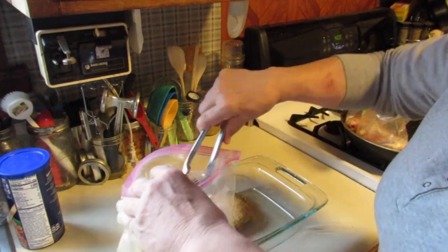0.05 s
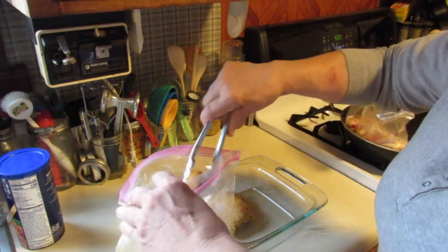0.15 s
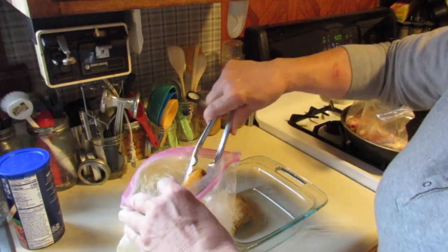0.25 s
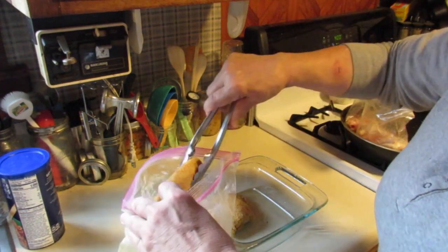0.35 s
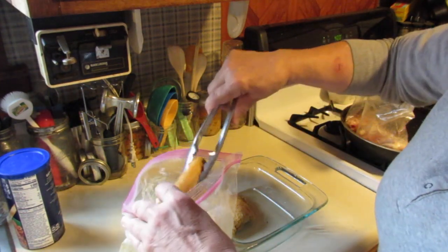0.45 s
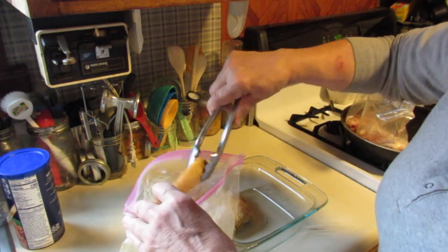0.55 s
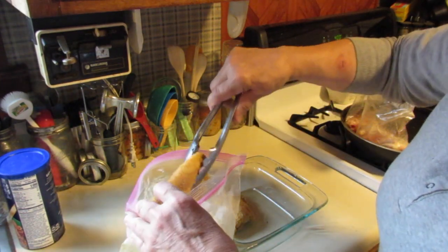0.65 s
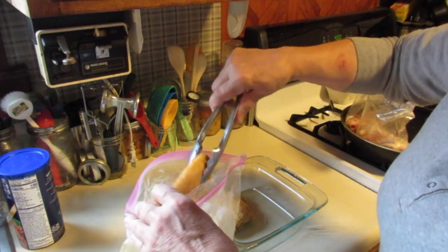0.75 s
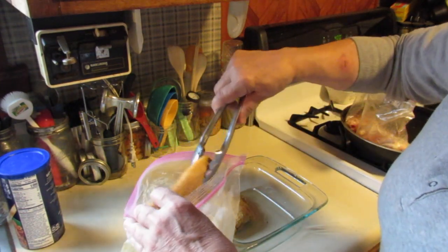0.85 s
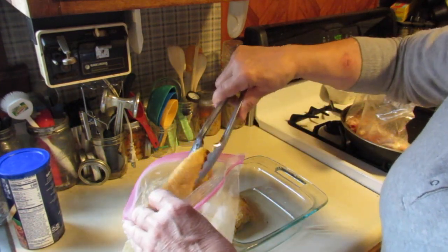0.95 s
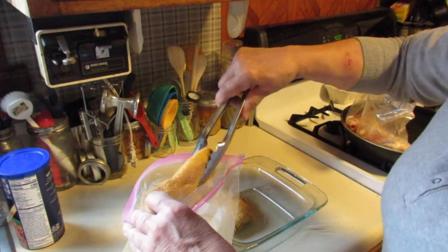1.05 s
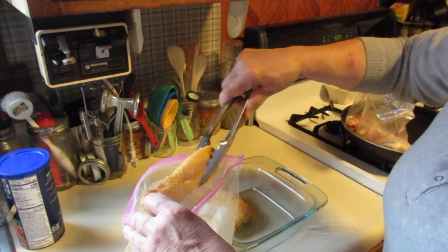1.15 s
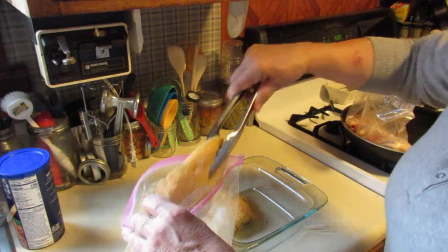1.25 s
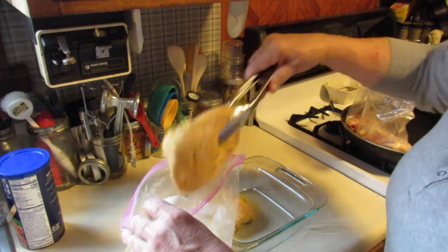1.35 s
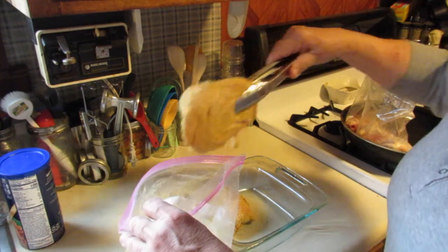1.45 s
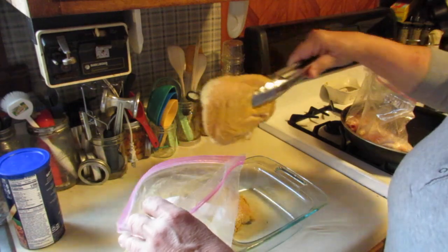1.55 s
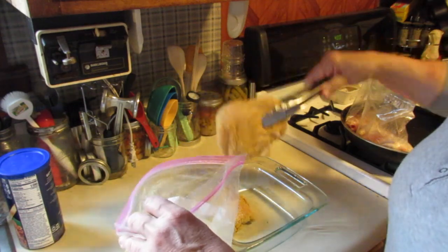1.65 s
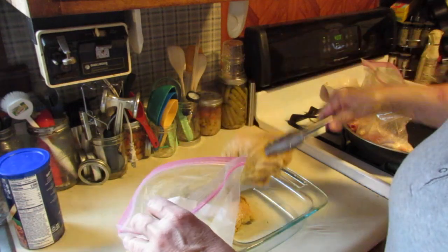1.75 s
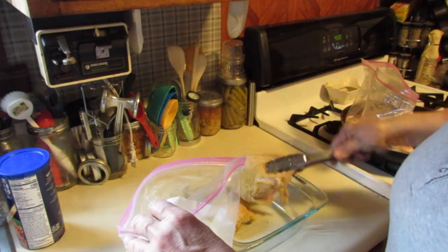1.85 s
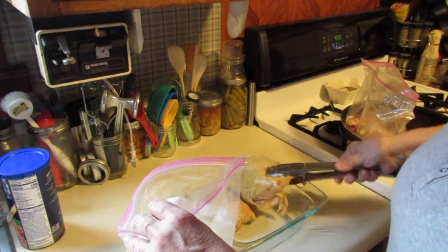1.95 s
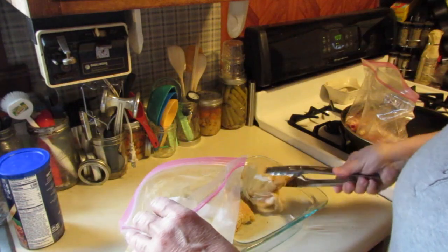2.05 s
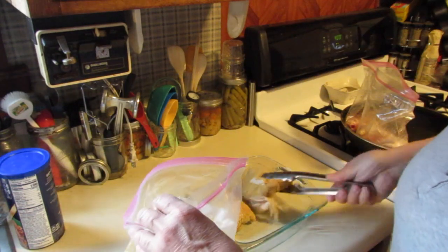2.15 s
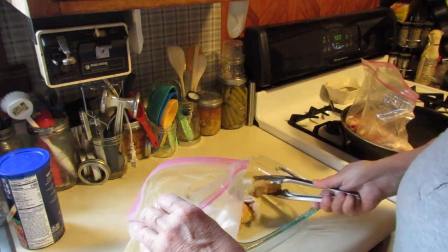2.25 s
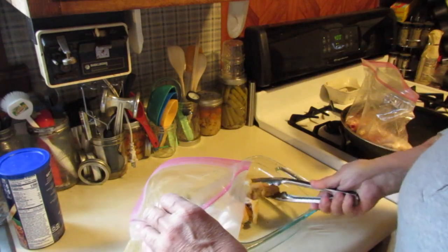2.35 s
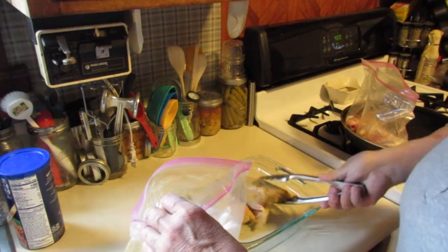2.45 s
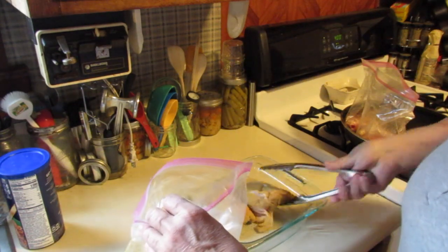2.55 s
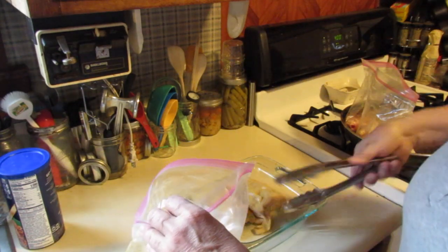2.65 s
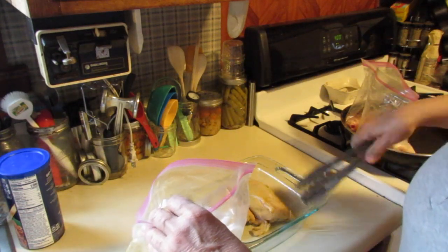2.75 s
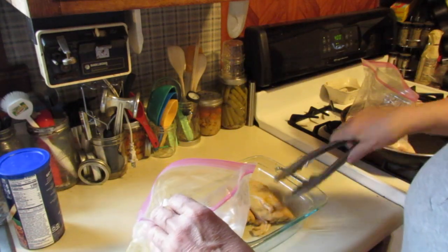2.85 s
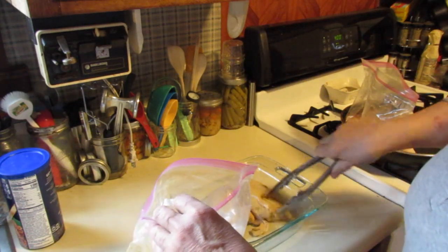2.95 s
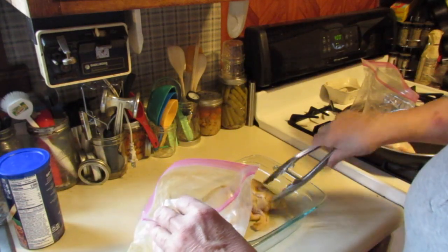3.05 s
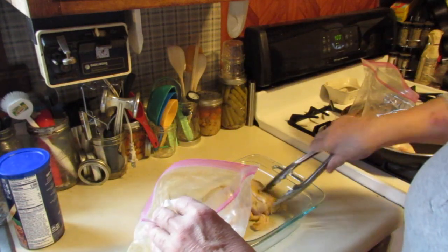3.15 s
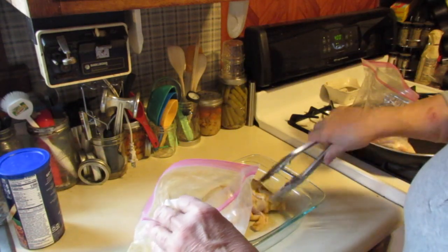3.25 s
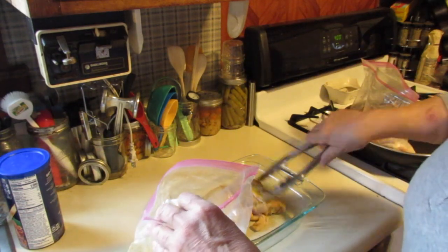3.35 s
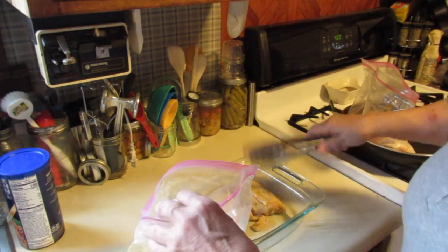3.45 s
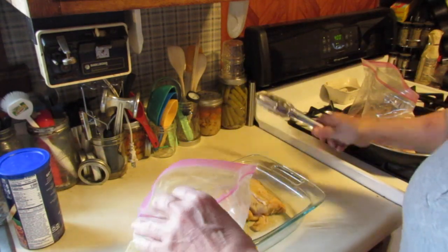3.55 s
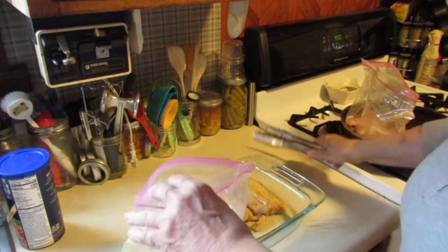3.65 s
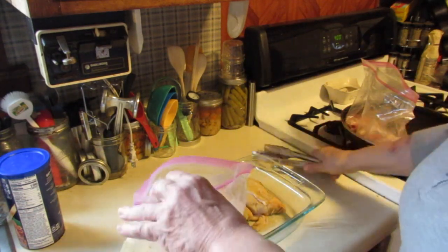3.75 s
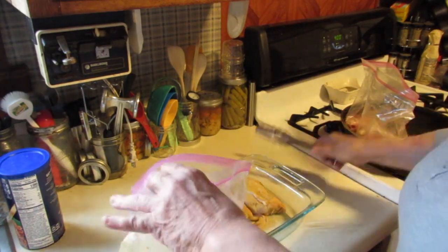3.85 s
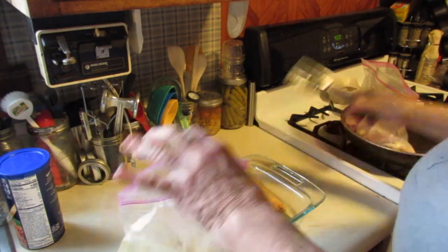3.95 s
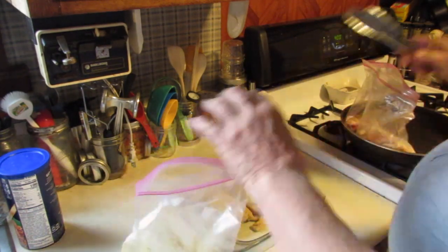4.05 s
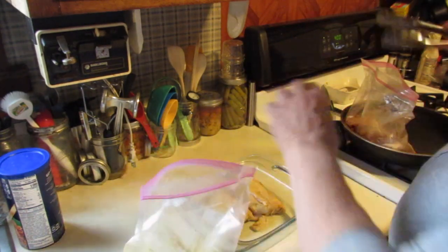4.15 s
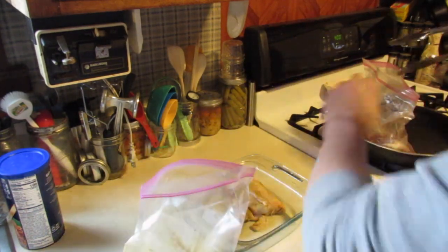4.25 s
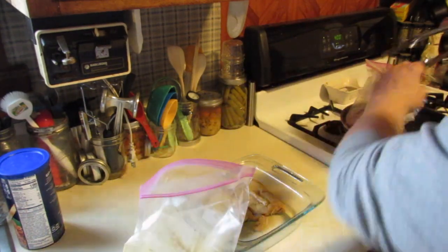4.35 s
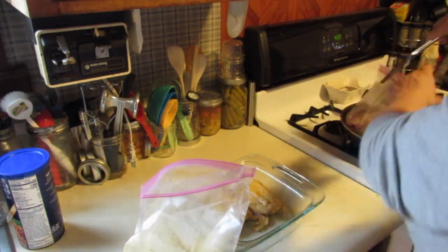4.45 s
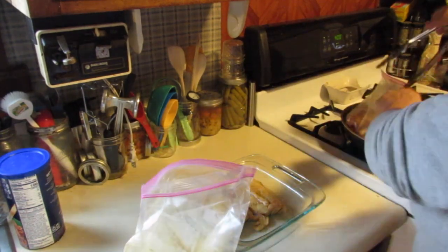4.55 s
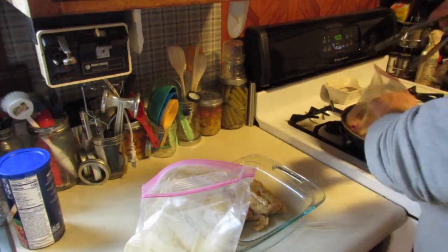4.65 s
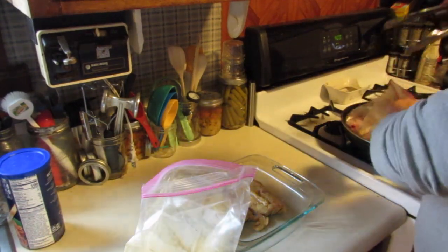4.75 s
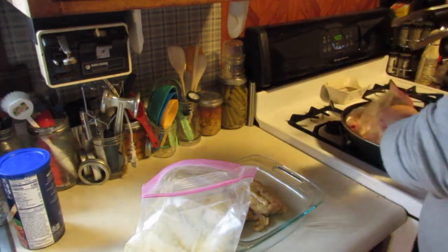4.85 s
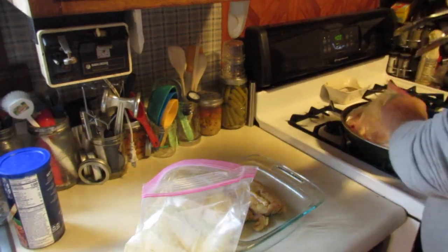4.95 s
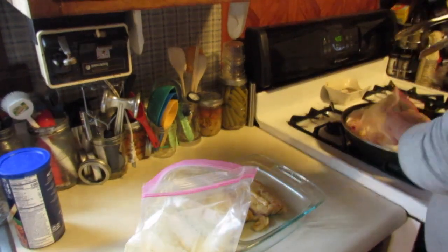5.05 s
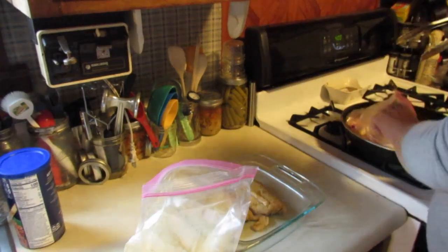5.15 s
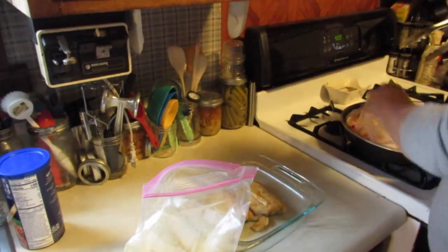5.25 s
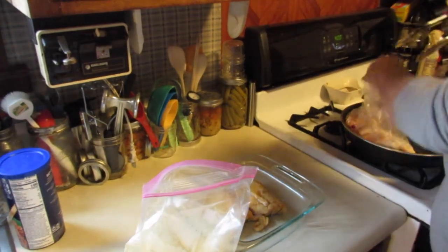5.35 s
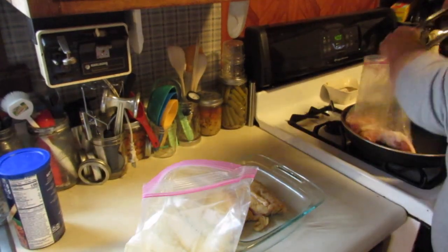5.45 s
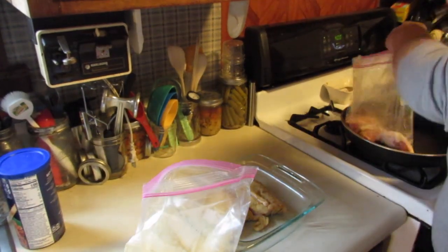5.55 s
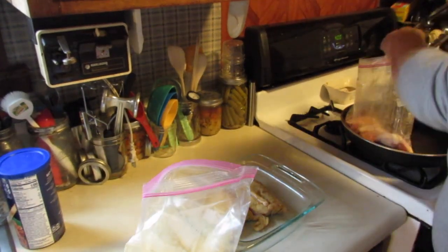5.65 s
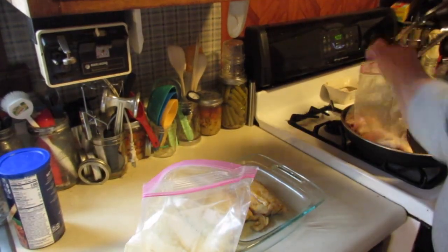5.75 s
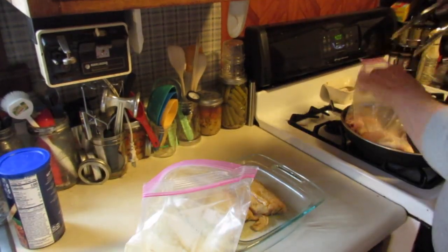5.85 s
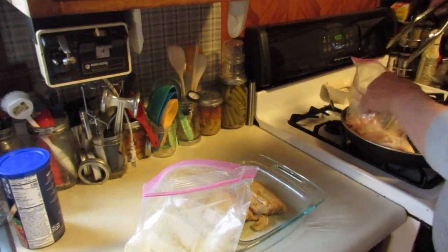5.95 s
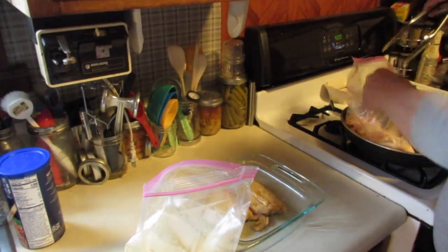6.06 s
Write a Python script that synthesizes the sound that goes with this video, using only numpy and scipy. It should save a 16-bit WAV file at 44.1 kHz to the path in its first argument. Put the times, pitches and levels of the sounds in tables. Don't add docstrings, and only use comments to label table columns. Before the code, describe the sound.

In a small kitchen, film rustles and snaps, steel tongs clack and jangle on glass, then a heavier plastic bag crinkles loudly over low fridge hum.

```python
import sys
import numpy as np
from scipy import signal
from scipy.fft import rfft, irfft, next_fast_len
from scipy.io import wavfile
from scipy.ndimage import uniform_filter1d

SR = 44100
rng = np.random.default_rng(int(sys.argv[2]) if len(sys.argv) > 2 else 0)


def nominal_scale(level):
    x = np.asarray(level, float) / 20
    return 10 ** x


def digitize_waveform(pressure):
    field = np.atleast_2d(pressure).T
    bounded = np.clip(field, -1, 1)
    quanta = np.round(bounded * 32767).astype(np.int16)
    wavfile.write(sys.argv[1], SR, quanta)


N = 268569


def evened(x):
    return x / np.sqrt(np.mean(x ** 2) + 1e-20)


def read(points, hz):
    f, value = np.transpose(points)
    return np.interp(np.log(hz + 1), np.log(f + 1), value)


def add(mix, s, sound):
    part = mix[round(s * SR):][:len(sound)]
    part += sound[:len(part)]


def colour(points, tilt_db=0):
    hz = abs(np.fft.fftfreq(4096, 1 / SR))
    tilt = tilt_db * np.tanh(np.log((hz + 1) / 3000))
    log_gain = np.log(nominal_scale(read(points, hz) + tilt))
    taps = np.fft.ifft(np.exp(np.conj(signal.hilbert(log_gain)))).real[:2048]
    return taps / np.linalg.norm(taps)


def resonate(x, hz, width):
    return signal.lfilter(*signal.iirpeak(hz, hz / width, SR), x)


def swell(rows):
    s, db, rise, fall = np.array(rows).T[:4, :, None]
    t = np.arange(0, N / SR + 1, 1 / 1000) - s
    climb = -t / np.maximum(rise, 0.003)
    decay = t / np.maximum(fall, 0.003)
    return nominal_scale(db - 20 * np.where(t < 0, climb, decay))


def stretched(curve):
    return np.interp(np.arange(N) / SR * 1000, np.arange(len(curve)), curve)


def creases(per_s, spread_db):
    clumps = nominal_scale(0.48 * evened(uniform_filter1d(rng.standard_normal(N), 400)))
    size = nominal_scale(spread_db * np.minimum(rng.exponential(1, N), 5))
    size *= rng.choice([-1., 1.], N)
    return evened(size * clumps * (rng.random(N) < per_s / SR))


CHATTER_DB = 3.5


def struck(shake, modes, twins, chatter):
    out = np.zeros(len(shake))
    settling = np.minimum(np.arange(len(shake)) / SR / 0.015, 1)
    for k, ((hz, width, db), twin) in enumerate(zip(modes, twins)):
        width = max(width, 24 + hz / 200)
        share = np.linalg.norm(shake) * np.sqrt(np.pi * width / SR / len(shake))
        family = evened(resonate(shake, hz, width))
        family -= nominal_scale(-6) * evened(resonate(shake, hz * twin, width))
        family += nominal_scale(-15.5) * evened(resonate(shake, hz / twin ** 1.67, width))
        flicker_db = CHATTER_DB * settling * np.roll(chatter, shift=k * 377)
        out += nominal_scale(db + flicker_db) * share * family
    return out


# start in seconds, force in dB,
# clatter in dB, clatter brightness in dB, rattle in seconds.
BLOWS = [(2.3172, -34, -58, -32, 0.073), (2.5143, -17.5, -22, -4.5, 0.014), (2.6096, -30, -38, -2.5, 0.011),
         (2.7356, -19.5, -31, 1, 0.014), (2.7576, -23.5, -30, 4, 0.024), (2.779, -24, -24.5, 10, 0.019),
         (2.7876, -33, -23.5, 3, 0.015), (2.9521, -16, -15, 6, 0.0039), (2.9565, -16, -25, -2.5, 0.016),
         (3.1919, -17, -19, 0.5, 0.018), (3.3146, -33, -36.5, 12, 0.016), (3.788, -13, -21, 14, 0.0097)]
BOUNCES = [
    (2.5142, -25, -15.5, -0.5, .001),
    (2.5195, -36, -34, 5, 0.0045),
    (2.7607, -34, -20, 5, .006),
    (2.9615, -35, -37, 6, 0.0074),
    (3.1957, -22.5, -29, 1, .01),
    (3.2065, -23, -34, 2, 0.0078),
    (3.318, -34, -40, 10, 0.0091),
    (3.7878, -28, -17, -3.5, 0.0011),
    (3.7925, -26, -36, 2, .01),
    (3.9331, -50, -48, -4, .01),
]
GRIPS = [2.4, 2.6, 2.7, 2.75, 2.9, 3.1, 3.3, 3.6]
# pitch in Hz, width in Hz, level in dB.
DISH = [
    [(298, 53, -1.5), (438, 65, -1), (613, 78, -0.5), (830, 79, -7)],
    [(357, 47, -6), (1086, 59, 3), (1210, 37, -5), (2340, 29, 1), (1390, 50, -9), (435, 40, -8),
     (586, 56, -9), (850, 50, -6), (1000, 50, 0), (2610, 36, -10)],
    [(1254, 91, 7.5), (1470, 80, -3), (2050, 68, -11), (2600, 90, -8)],
    [(424, 110, -7.5), (1366, 24, 13), (1804, 56, 6), (1603, 44, -1), (2390, 72, -14), (3060, 54, -8)],
    [(460, 24, 5), (2280, 21, -3), (1165, 45, -3), (2130, 37, -6.5), (2680, 40, -13)],
    [(436, 63, 6.5), (560, 40, -14), (1337, 28, 4), (2546, 46, -7.5), (846, 46, -2), (2170, 53, -13),
     (480, 30, -4), (1023, 45, -7), (1140, 37, -13), (270, 24, -1)],
    [(430, 21, 6), (600, 60, 1), (800, 100, 1.5), (1352, 29, 13), (2196, 55, -5.5), (2575, 45, -1.5),
     (1003, 42, -3), (494, 20, -0.5), (940, 45, -2.5), (1127, 62, -3)],
    [],
    [(437, 22, 7), (603, 70, 9.5), (840, 65, -1.5), (1040, 160, 1), (1270, 100, 3.5), (1507, 68, 1),
     (1680, 39, 1), (1963, 37, -14), (1870, 32, -8), (492, 44, -2)],
]
# pitch in Hz, width in Hz, level in dB.
TONGS = [
    [],
    [(4960, 1100, -8), (5950, 930, -2.5), (7040, 420, -4), (6360, 40, -9), (4800, 30, -10), (7080, 38, -5),
     (8260, 25, -12), (9400, 150, -18)],
    [(6000, 660, -7)],
    [(3250, 650, -23), (4200, 53, -32), (4770, 75, -14), (6240, 130, -7)],
    [(4000, 54, -4.5), (4780, 23, -2), (4120, 54, -17), (8200, 820, -12), (10500, 460, -18), (7900, 40, -5),
     (8506, 40, -10), (11600, 150, -22)],
    [(3630, 50, -9), (4160, 54, -9), (6600, 460, -6), (7400, 1050, -12), (7900, 54, -8.5), (6800, 31, -17),
     (6800, 25, -20), (4974, 35, -14.5), (3380, 30, -14)],
    [(3180, 130, -3.5), (3960, 40, -5), (4710, 73, -6.5), (6700, 320, -8.5), (8210, 140, -5.5),
     (6350, 35, -4.5), (8140, 22, -8), (8850, 35, -17), (7470, 25, -5)],
    [(6900, 160, -15), (8600, 500, -15)],
    [(4300, 70, -23), (6300, 35, -9), (8900, 33, -9), (3170, 26, -14), (3110, 350, -4), (4660, 40, -7),
     (4880, 24, -3.5), (7340, 45, -4), (7600, 30, -12), (5670, 380, -15.5), (8450, 1900, -8.5),
     (10340, 380, -8.5)],
]
# frequency in Hz, level in dB.
CLATTER = [(60, -52), (200, -0.5), (400, 1), (1200, -6.5), (2500, 1), (4500, -5), (7000, -2), (10000, -0.5),
           (15000, -6)]


def tongs(blows):
    u, out = np.arange(9000) / SR, np.zeros(N)
    chance = rng.standard_normal((len(blows), 9000))
    twins = 1 + rng.uniform(0.008, 0.041, (len(DISH), 24)) * rng.choice([-1, 1], (len(DISH), 24))
    low_cut = signal.butter(2, 260, "high", fs=SR)
    for (s, force_db, clatter_db, bright_db, rattle), noise in zip(blows, chance):
        grip = np.searchsorted(GRIPS, s)
        shake = noise * np.exp(-u / max(rattle, 0.001)) * np.minimum(u / 0.0004, 1)
        shake[0] += 3
        chatter = evened(uniform_filter1d(noise[::-1], size=300))
        body = struck(shake, DISH[grip] + TONGS[grip], twins[grip], chatter)
        add(out, s, nominal_scale(force_db + 14.5) * signal.lfilter(*low_cut, body))
        add(out, s, nominal_scale(clatter_db) * signal.fftconvolve(shake, colour(CLATTER, bright_db)))
    return out


# start in seconds, stop in seconds,
# level in dB.
RINGS = [
    (2.635, 2.76, -51),
    (2.81, 2.975, -38.5),
    (3.015, 3.187, -36),
    (3.244, 3.42, -32.5),
]
RING_HZ, RING_T60_S, RING_RISE_S = 1352, 1.04, 0.016
RING_WAVER_DB, RING_WAVER_RAD = 0.4, 0.092


def ring():
    out = np.zeros(N)
    for s, stop, db in RINGS:
        t = np.arange((stop - s) * SR) / SR
        rise = 1 - np.exp(-(t / RING_RISE_S) ** 2)
        damping = np.minimum(t[::-1] / (0.51 * (stop - s)), 1)
        swing, slip = (evened(uniform_filter1d(rng.standard_normal(len(t)), size=900)) for _ in range(2))
        tone = np.sin(2 * np.pi * RING_HZ * (t + s) + RING_WAVER_RAD * slip)
        level = nominal_scale(db - 60 * t / RING_T60_S + RING_WAVER_DB * swing)
        add(out, s, level * rise * damping * tone)
    return out


# peak in seconds, level in dB, 20 dB rise in seconds, 20 dB fall in seconds
JIGGLE = [
    (2.662, -49.5, 0.46, 0.1),
    (2.86, -60, -2.3, 0.3),
    (3.05, -57.5, -0.6, 1.16),
    (3.32, -49.5, -0.3, -0.22),
    (3.435, -56, -0.1, -0.4),
]
# pitch in Hz, width in Hz, level in dB.
HINGE = [(4830, 590, -2), (6900, 460, 4), (8100, 1900, 12), (10400, 1400, 4), (11800, 1200, -4)]


def hinge():
    knocks = creases(per_s=4900, spread_db=4.0)
    rings = evened(sum(nominal_scale(db) * resonate(knocks, hz, width) for hz, width, db in HINGE))
    return stretched(swell(JIGGLE).sum(0)) * rings


def puckered(x, patchy_db):
    z = signal.stft(x, nperseg=256)[2]
    patches = rng.standard_normal(z.shape[::-1])
    patches = evened(uniform_filter1d(uniform_filter1d(patches, 8, 0), 4, 1)).T
    return evened(signal.istft(z * nominal_scale(patchy_db * patches), nperseg=256)[1][:N])


# peak in seconds, crackle in dB, 20 dB rise in seconds,
# 20 dB fall in seconds, body of the film in dB over the crackle.
NEAR_BAG = [(0.0, -48.5, .01, 1.14, 3.5), (.044, -48, -0.1, 0.04, -9), (.072, -48, .03, .03, -4),
            (.199, -53, -0.36, -0.04, 2), (.361, -50, -0.05, -0.22, 0), (.31, -56, -0.7, 0.7, -4),
            (0.602, -48, .015, 0.05, -4), (.7, -53.5, 0.03, 0.16, 2.5), (1.01, -55.5, 1, 0.35, -2),
            (1.18, -60, 0.5, 0.36, 9.5), (1.325, -48.5, 0.08, 0.17, -2), (1.392, -46, 0.06, 0.11, 4.5),
            (1.5, -62, 0.05, 0.3, -2), (1.58, -60, 0.05, 0.2, -6)]
PAN_BAG = [(3.9, -49.5, 0.021, 0.14, 2.5), (4.061, -47, 0.035, 0.067, 3.5), (4.188, -57, .02, .1, -11),
           (4.29, -53.5, 0.017, 0.69, 4), (4.44, -38.5, 0.01, 0.087, 5.5), (4.52, -40.5, 0.003, 0.15, 7.5),
           (4.558, -32.5, 0.068, 0.077, -2), (4.73, -53, 0.022, 0.21, 8.5),
           (4.834, -42.5, 0.0082, 0.24, -2), (5.039, -39, 0.16, 0.41, 2.5), (5.17, -39.5, 0.34, 0.085, -7),
           (5.259, -42.5, 0.008, 0.068, -6), (5.335, -43.5, .05, 0.11, 2.5), (5.384, -36, 0.058, 0.057, 3),
           (5.441, -38.5, 0.031, 0.13, 8), (5.462, -38.5, 0.023, 0.045, 7.5), (5.481, -31, 0.11, 0.076, 0),
           (5.53, -40.5, 0.066, .06, 3.5), (5.66, -51.5, 0.086, 0.064, 9), (5.727, -47.5, 0.013, 0.22, 2.5),
           (5.792, -44.5, 0.021, 0.21, 2), (5.88, -44.5, 0.12, 0.03, 2), (6.0, -48, 0.042, 0.14, 3),
           (6.06, -38, 0.0062, 0.048, -1.5)]
# peak in seconds, level in dB, 20 dB rise in seconds,
# 20 dB fall in seconds.
SETTLING = [
    (4.523, -32, 0.05, 0.19),
    (5.035, -40, 0.07, -0.5),
]
# frequency in Hz, level in dB.
CRACKLE = [(1500, -28), (3000, -1.5), (4500, -1), (7000, 1), (10000, -1.5), (15500, -8.5)]
FILM = [(300, 1.5), (600, 0), (1000, 4.5), (1800, 2.5), (2600, -4), (4500, -17), (9000, -80)]
FLAP = [(30, -11), (80, -17), (200, -5.5), (400, 1.5), (700, -11), (1500, -81)]
FLAP_DB, FLAP_FOLLOWS_FILM = -8.5, 0.85


def bag():
    stream = creases(per_s=3000, spread_db=2.0)
    broad = evened(stream + 0.89 * creases(per_s=1500, spread_db=1.0))
    flaps = creases(per_s=1500, spread_db=2.0)
    layers = [(stream, CRACKLE), (broad, FILM), (flaps, FLAP)]
    sounds = [puckered(signal.oaconvolve(x, colour(c))[:N], patchy_db=2.0) for x, c in layers]
    squeezes = NEAR_BAG + PAN_BAG
    film_db = np.array(squeezes)[:, -1]
    shares = nominal_scale(np.array([0 * film_db, film_db, FLAP_DB + FLAP_FOLLOWS_FILM * film_db]))
    power = shares ** 2 @ swell(squeezes) ** 2
    power[2] += (swell(SETTLING) ** 2).sum(0)
    return sum(stretched(np.sqrt(p)) * sound for p, sound in zip(power, sounds))


# start in seconds,
# peak in dB, pitch of the fold or tick in Hz, film body in dB (lower is less body).
SNAPS = [(0.04, -23, 7430, -15), (0.196, -27, 2760, 0), (0.294, -28.5, 5700, 0), (0.358, -25.5, 3260, -2),
         (0.418, -28, 2770, -17), (0.6, -31, 5560, -1), (0.659, -28.5, 3120, -4), (0.713, -32, 2800, 0),
         (1.331, -29.5, 9200, 2.5), (1.384, -25, 1500, 0), (1.397, -32, 3500, 3), (1.574, -28, 2780, -4.5),
         (1.617, -33, 2770, 1), (2.15, -34.5, 6900, -4), (2.2465, -30.5, 5500, 0), (2.257, -30.5, 5850, 1),
         (2.347, -29, 9100, -20), (3.434, -36.5, 7400, -26), (4.2874, -30.5, 3060, 5),
         (4.441, -27.5, 1800, -20), (4.519, -18, 3710, 4), (4.731, -31, 3710, -12), (4.829, -34, 5360, 3),
         (4.889, -31.5, 5990, 4.5), (5.264, -25.5, 6830, 4.5), (5.377, -16.5, 2990, 4.5),
         (5.431, -26, 2200, 7), (5.718, -28, 3940, -22), (5.792, -23, 6900, -5), (5.881, -23, 5950, -12),
         (6.005, -26, 2600, -15), (6.056, -34, 6200, -15)]
SPRAY_S = 0.0087


def snaps():
    u, out = np.arange(3000) / SR, np.zeros(N)
    crackle, film = colour(CRACKLE), colour(FILM)
    for (s, db, hz, film_db), (grain, size) in zip(SNAPS, rng.standard_normal((len(SNAPS), 2, 3000))):
        spray = grain * nominal_scale(8.1 * size) * np.exp(-u / SPRAY_S) * np.minimum(u / 0.0035, 1)
        spray *= np.sqrt(SPRAY_S * SR) / np.linalg.norm(spray)
        spray[0] += 5
        wide = signal.fftconvolve(spray, 0.12 * crackle + nominal_scale(film_db) * film)[:3000]
        pitched = nominal_scale(4.5) * resonate(spray, hz, 0.76 * hz)
        add(out, s, nominal_scale(db - 16.5) * (wide + pitched))
    return out


# start in seconds, peak in dB, pitch in Hz.
TICKS = [(0.0414, -35, 7500), (0.107, -53, 2500), (0.1954, -28.5, 2630), (0.197, -30, 5500),
         (0.2566, -37, 1900), (0.2949, -36, 5000), (0.358, -27, 2350), (0.3585, -44, 3600),
         (0.5977, -34, 4500), (0.7114, -32, 2600), (1.012, -40, 2200), (1.196, -34.5, 2420),
         (1.3091, -43, 1500), (1.3336, -42, 2500), (1.3853, -25, 1470), (1.605, -36, 2000),
         (1.6342, -35, 3200), (4.287, -30, 1900), (4.442, -25, 1820), (4.45, -29, 1800), (4.518, -27, 1290),
         (4.5293, -25, 1630), (4.8307, -44, 5000), (4.8857, -28, 4000), (5.0331, -31, 2140),
         (5.2571, -29, 5000), (5.316, -32, 5000), (5.388, -17, 1080), (5.437, -15, 2500),
         (5.461, -18, 2200), (5.635, -39, 2980), (5.7934, -36, 1930), (5.9786, -32, 2400),
         (6.0574, -42, 4000)]
TICK_CYCLES = 1.1


def ticks():
    u, out = np.arange(600) / SR, np.zeros(N)
    for s, db, hz in TICKS:
        add(out, s, nominal_scale(db) * np.sin(2 * np.pi * hz * u) * np.exp(-u * hz / TICK_CYCLES))
    return out


# start in seconds, peak in dB,
# pitch in Hz, length in seconds.
BUMPS = [
    (2.3192, -20.5, 395, 0.0081),
    (2.336, -26.5, 438, 0.0081),
    (4.517, -31, 215, 0.012),
    (4.577, -33, 59, 0.02),
    (5.0155, -28.5, 332, 0.0046),
    (5.025, -25, 103, 0.011),
    (5.045, -23, 306, 0.0025),
    (5.065, -41, 64, 0.046),
    (5.44, -37, 158, 0.023),
]


def bumps():
    u, out = np.arange(6000) / SR, np.zeros(N)
    for s, db, hz, length in BUMPS:
        add(out, s, nominal_scale(db) * np.sin(2 * np.pi * hz * u) * np.exp(-u / max(length, 0.002)))
    return out


# peak in seconds, level in dB, 20 dB rise in seconds,
# 20 dB fall in seconds.
PAN_HUM = [
    (3.95, -59, 0.1, 0.4),
    (4.06, -57.5, 0.17, .3),
    (4.17, -65, .2, 0.22),
]
PAN_HZ, PAN_WIDTH_HZ = 1800, 83


def pan():
    hum = rng.standard_normal(N)
    for _ in range(2):
        hum = resonate(hum, PAN_HZ, PAN_WIDTH_HZ)
    return stretched(swell(PAN_HUM).sum(0)) * evened(hum)


# frequency in Hz, time to die by 60 dB in seconds.
KITCHEN = [(200, 0.2), (1000, 0.21), (4000, 0.25), (12000, 0.18)]
# frequency in Hz, level in dB.
ROOM_COLOUR = [(100, 6.5), (600, -1.5), (1500, -0.5), (15000, 1.5)]


def tail(t60s, start, size):
    taps = np.zeros(size)
    at = np.arange(start, size - 20, 20)
    taps[at + rng.integers(0, 20, len(at))] = rng.choice([-1., 1.], len(at))
    hz, t, z = signal.stft(taps, SR, nperseg=256)
    dying = z * nominal_scale(-60 * t / read(t60s, hz)[:, None])
    bands = rfft(signal.istft(dying, SR, nperseg=256)[1], size)
    bands /= np.sqrt(uniform_filter1d(abs(bands) ** 2, size=24))
    out = irfft(bands * nominal_scale(read(ROOM_COLOUR, np.fft.rfftfreq(size, 1 / SR))), size)
    out[:start] = 0
    out[size * 3 // 4:] = 0
    return out / np.linalg.norm(out)


# frequency in Hz, level in dB.
AIR = [(25, -51), (45, 1), (90, -8), (170, 1), (300, -3), (480, -7), (900, -14), (1500, -20.5),
       (2500, -27.5), (5000, -33), (9000, -36), (15500, -41)]
# frequency in Hz, likeness (1 is the same).
AIR_SAME = [(60, 0.25), (150, 0.18), (380, 0.071), (950, 0.35), (2380, 0.79), (5980, 0.36), (15000, 0.052)]
AIR_DB = -43.5
# pitch in Hz, width in Hz, level in dB, steady part over wavering part (ratio).
HUM = [(55.2, 8, -48.5, 2.6), (217.7, 12, -55, 1.6), (162.5, 36, -56, 1.6)]


def air():
    frames, hz = N // 512 + 5, np.fft.rfftfreq(2048, 1 / SR)
    a, b, c, d, patches = rng.standard_normal((frames, 1025, 5)).T
    patches = evened(uniform_filter1d(uniform_filter1d(patches, 20, 0), 8, 1))
    same = np.clip(read(AIR_SAME, hz), -1, 1)[:, None]
    left = a + 1j * b
    right = same * left + np.sqrt(1 - same ** 2) * (c + 1j * d)
    z = np.array([left, right]) * nominal_scale(read(AIR, hz)[:, None] + patches)
    out = nominal_scale(AIR_DB) * evened(signal.istft(z, nperseg=2048, noverlap=1536)[1][:, :N])
    for hum_hz, width, db, steady in HUM:
        r = np.exp(-np.pi * width / SR)
        wobble = rng.standard_normal((N, 2)) @ [1, 1j]
        for _ in range(2):
            wobble = signal.lfilter([1], [1, -r], wobble)
        wobble = steady + wobble / np.sqrt(np.mean(abs(wobble) ** 2))
        line = wobble * np.exp(2j * np.pi * hum_hz * np.arange(N) / SR)
        out += nominal_scale(db) * evened(np.array([line.real, (line * np.exp(1.1j)).real]))
    return out


def ported(x, room, ports):
    size = next_fast_len(N)
    smeared = rfft(signal.fftconvolve(x, room)[:N], size)
    return irfft(smeared * nominal_scale(read(ports, np.fft.rfftfreq(size, 1 / SR))), size)[:N]


# frequency in Hz,
# left-right difference in dB over the near sound.
PORTS = [(60, -29), (120, -6), (250, -35), (500, -14), (1000, -32), (2000, -31), (4000, -38), (7500, -9),
         (15000, -1)]
DISH_PORTS = [(100, -14), (380, -17), (700, -22), (1290, -14), (2380, -39), (4400, -29), (8100, -10.5),
              (15000, -4)]


def scene():
    far = tail(KITCHEN, start=180, size=SR // 2)
    close = tail(KITCHEN, start=10, size=SR // 2)
    metal, glass = tongs(BLOWS) + tongs(BOUNCES), ring()
    soft = hinge() + bag() + snaps() + ticks() + bumps() + pan()
    near = metal + glass + soft
    mid = near + nominal_scale(-7.5) * signal.fftconvolve(near, far)[:N]
    side = ported(soft, close, PORTS) + ported(metal, close, DISH_PORTS)
    side += nominal_scale(-27) * np.roll(glass, shift=8)
    return np.array([mid + side, mid - side]) + air()


def top_cut(x):
    return signal.sosfilt(signal.butter(12, 16240, fs=SR, output="sos"), x)


NOTCH_HZ, NOTCH_WIDTH_HZ, NOTCH_DEPTH = 678.5, 298, 0.88
LOW_CUT_HZ, TOP_HZ, TOP_DB, EDGE_HZ = 47, 14800, -36, 16250
# frequency in Hz, left minus right in dB.
LEAN = [(60, -0.5), (250, -1), (1000, -0.5), (2000, 0.5), (4000, 1.3), (12000, 0.1)]


def record(dry):
    b, a = signal.iirpeak(NOTCH_HZ, NOTCH_HZ / NOTCH_WIDTH_HZ, SR)
    notched = dry - NOTCH_DEPTH * signal.lfilter(b, a, dry)
    cut = signal.sosfilt(signal.butter(4, LOW_CUT_HZ, "high", fs=SR, output="sos"), notched)
    below = signal.oaconvolve(cut, signal.firwin(301, TOP_HZ, fs=SR)[None], "same")
    heard = np.tanh(below + nominal_scale(TOP_DB) * (cut - below))
    size = next_fast_len(N)
    hz = np.fft.rfftfreq(size, 1 / SR)
    lean = nominal_scale(np.outer([0.5, -0.5], read(LEAN, hz)))
    heard = irfft(rfft(heard, size) * lean * (hz < EDGE_HZ), size)[:, :N]
    return top_cut(heard)


dry = scene()
out = record(dry)
digitize_waveform(out)
```